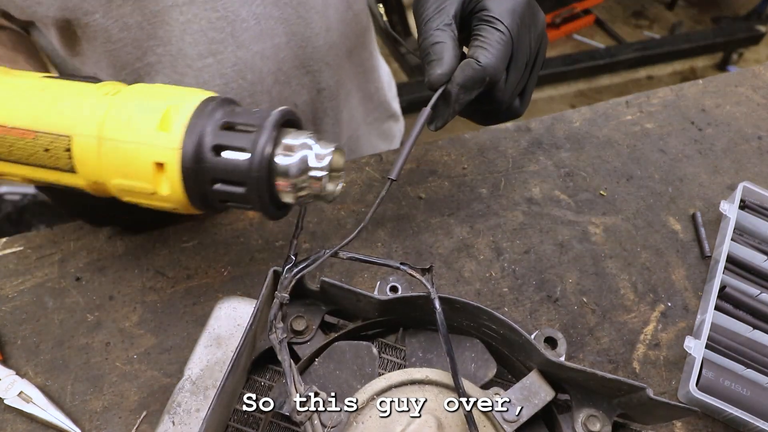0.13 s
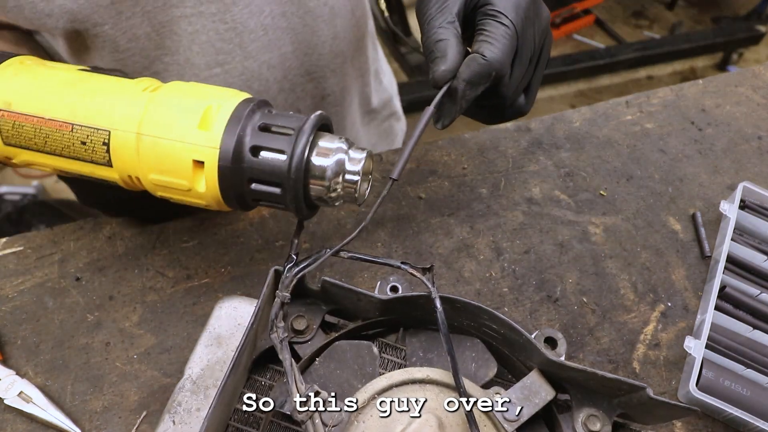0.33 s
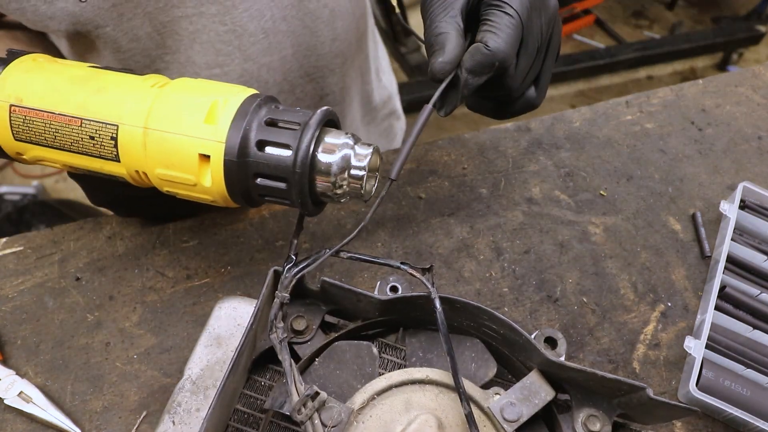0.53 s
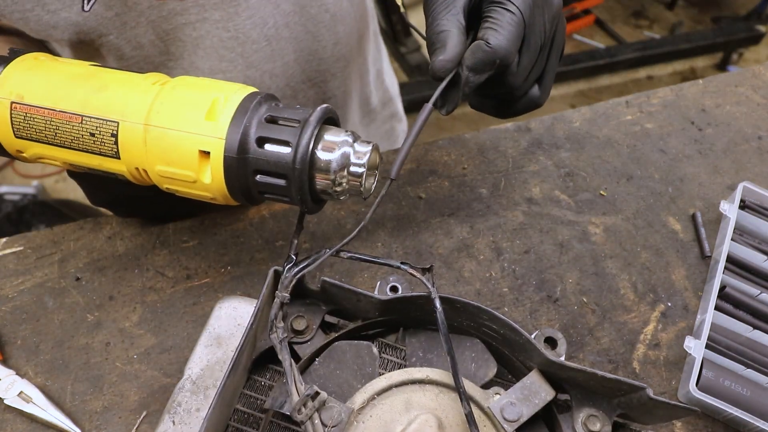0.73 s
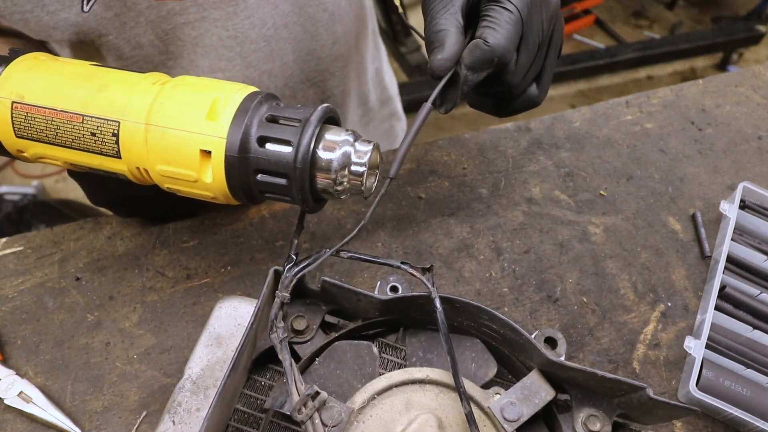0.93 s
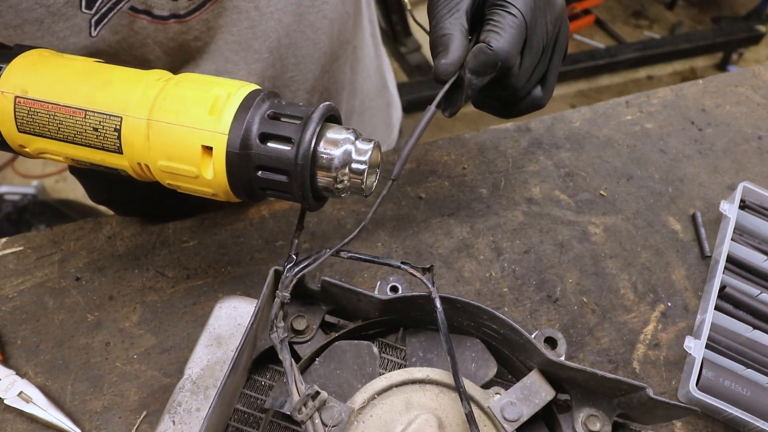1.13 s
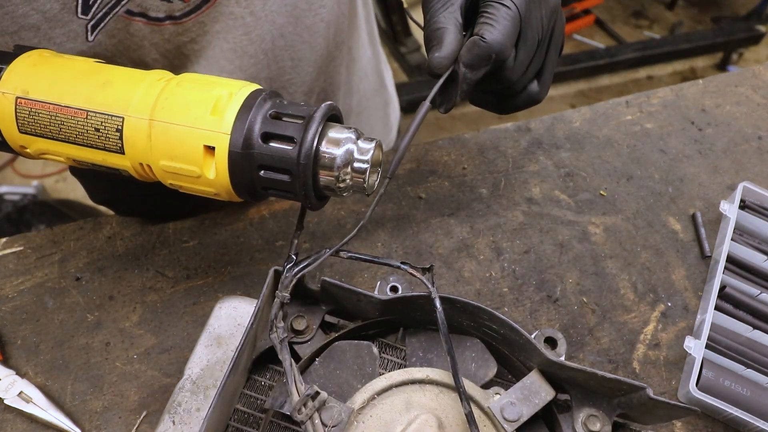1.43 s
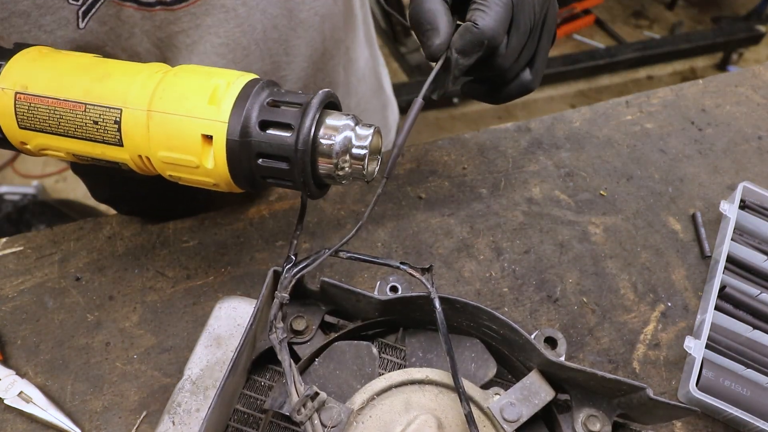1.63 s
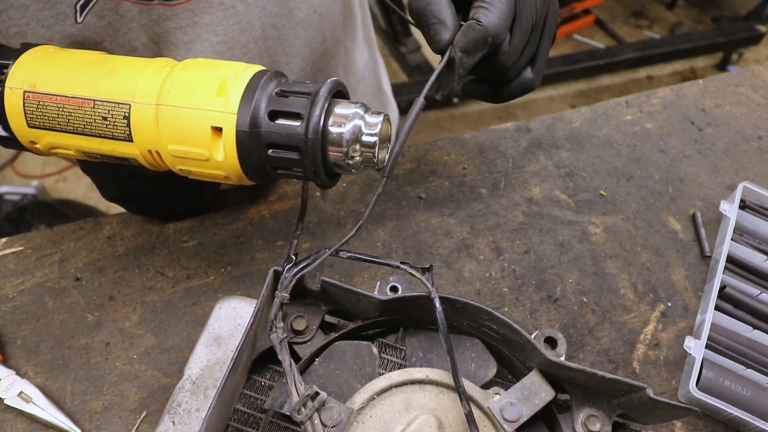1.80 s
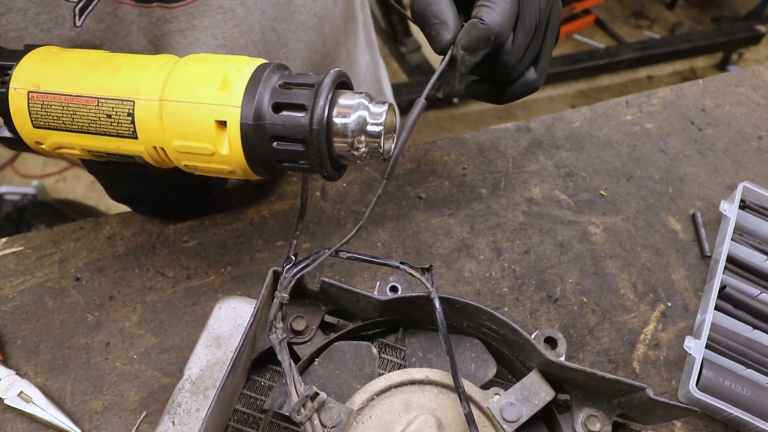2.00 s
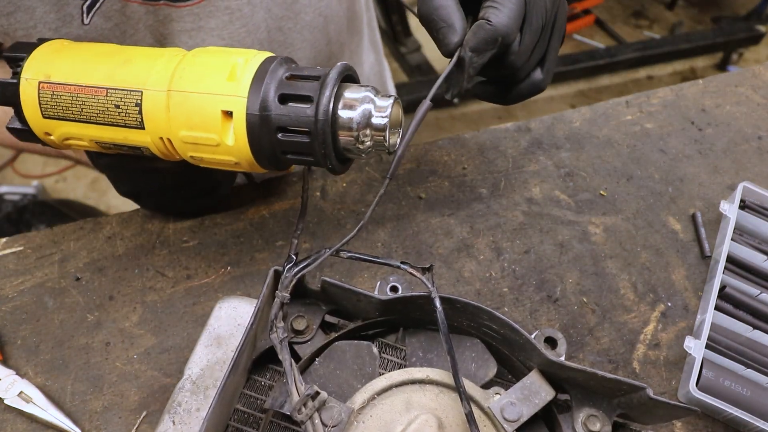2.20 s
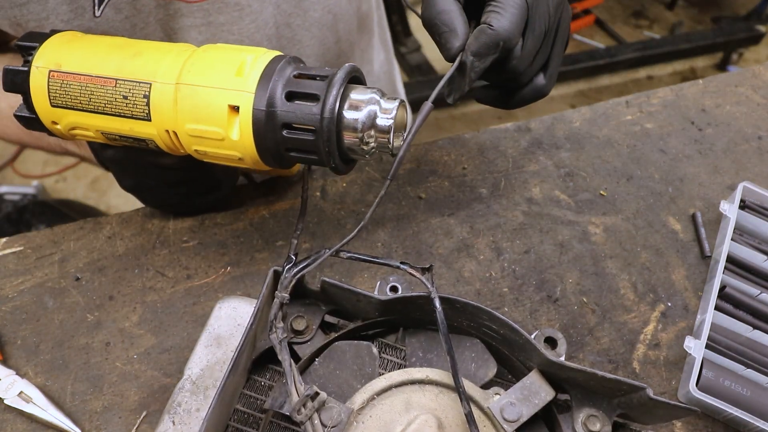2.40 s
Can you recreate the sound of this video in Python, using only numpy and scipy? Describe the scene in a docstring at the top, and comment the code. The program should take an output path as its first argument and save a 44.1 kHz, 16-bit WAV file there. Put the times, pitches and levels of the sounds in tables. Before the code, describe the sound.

Steady loud hiss of hot air from an electric heat gun at a workbench, heard close and dry in the centre; fan whine beneath, an early change of tone, then a faint low bump.

```python
"""An electric heat gun runs steadily over a workbench, close to the microphone, shrinking tubing on a wire.
Throughout, filtered noise makes the rush of the barrel and the hiss of the nozzle's resonances, over
the sine harmonics of the fan's thin whine and a faint mains hum from the motor.
At the start the hiss changes colour as the nozzle swings onto the wire, and a notch slides up the treble.
One soft bump, a short windowed tone, follows; later a band of the treble dips for half a second."""
import sys
import numpy as np
from scipy import signal
from scipy.fft import rfft, irfft
from scipy.io import wavfile

SR = 44100
rng = np.random.default_rng(int(sys.argv[2]) if len(sys.argv) > 2 else 0)


def wav_record(signal):
    """Record a signal, one row per channel, as 16-bit PCM in the file named by sys.argv[1]."""
    frames = np.transpose(np.atleast_2d(signal))
    bounded = np.clip(frames, -1, 1)
    # unit amplitude maps onto the largest positive 16-bit level
    quanta = np.round(bounded * 32767).astype(np.int16)
    wavfile.write(sys.argv[1], SR, quanta)


N = 112454  # samples
TIME = np.arange(N) / SR  # seconds
BINS = np.maximum(np.fft.rfftfreq(N, 1 / SR), 1)  # Hz, kept above zero for divisions and logarithms


def from_db(db):
    """Logarithmic level: decibels become an amplitude gain."""
    return 10 ** (np.asarray(db) / 20)


def in_time(rows):
    """Linear interpolation: each column of a curve is read at every sample."""
    seconds, *columns = np.transpose(rows)
    return [np.interp(TIME, seconds, column) for column in columns]


def drift(rate_hz):
    """Low-pass noise: a smooth random wander with a standard deviation of 1."""
    spectrum = rfft(rng.standard_normal(N))
    slow = irfft(spectrum / (1 + (BINS / rate_hz) ** 2), N)
    return slow / slow.std()


def air_noise(slope=(), resonances=()):
    """Turbulence as shaped white noise: the powers of a broad spectrum and of resonant peaks add."""
    power = 0
    if len(slope):
        hz, density_db = np.transpose(slope)
        # straight lines in dB over log frequency
        power = from_db(np.interp(np.log(BINS), np.log(hz), density_db)) ** 2
    for centre, width, peak_db in resonances:
        detune = (BINS / centre - centre / BINS) * centre / width
        power = power + (from_db(peak_db) / (1 + detune ** 2)) ** 2
    white = rfft(rng.standard_normal(N))
    return irfft(white * np.sqrt(power * SR / 2), N)


def notch(x, centre_hz, depth, width_hz):
    """Heterodyne band rejection: a band is shifted to 0 Hz, low-passed, shifted back and subtracted."""
    carrier = np.exp(2j * np.pi * np.cumsum(centre_hz * np.ones(N)) / SR)
    pole = np.exp(-np.pi * width_hz / SR)
    shifted_band = signal.lfilter([1 - pole], [1, -pole], x / carrier)
    band = 2 * (shifted_band * carrier).real
    return x - np.clip(depth, 0, 1) * band


HUM_HZ, HUM_DB, HUM_WAVER_DB = 604, -62, 2.5  # pitch, typical rms level, standard deviation of the waver


def motor_hum():
    """Amplitude modulation: the motor's faint mains hum is one sine whose level wavers at random."""
    level_db = HUM_DB + HUM_WAVER_DB * drift(6.4)
    return np.sqrt(2) * from_db(level_db) * np.sin(2 * np.pi * HUM_HZ * TIME)


BUMP_S, BUMP_WIDTH_S = .657, 0.0078  # middle, and time from there to 1/e of the envelope's peak
BUMP_HZ, BUMP_DB = 360, -41  # pitch, and peak of the envelope


def bump():
    """Gaussian tone burst: a soft handling bump is a few rounded cycles of one low tone."""
    age = TIME - BUMP_S
    envelope = np.exp(-(age / BUMP_WIDTH_S) ** 2)
    return from_db(BUMP_DB) * envelope * np.sin(2 * np.pi * BUMP_HZ * age)


# Blade-passing rate of the fan. Each row: time in seconds, rate in Hz before a small random wobble.
BLADE_RATE = [(0, 1445), (.17, 1445), (.45, 1438), (.6, 1437.5), (.93, 1429), (1.22, 1426), (1.55, 1430),
              (1.95, 1435.5), (2.38, 1443), (2.55, 1443)]
# Harmonics of the whine. Each row: multiple of the blade rate, rms level in dB before the flicker.
WHINE = [(1, -43.5), (2, -45.5), (3, -48.5), (4, -38.5), (5, -54.5), (6, -45.5), (7, -48.5), (8, -51.5),
         (9, -46), (10, -52), (11, -47)]
SPEED_WOBBLE = 0.00055  # standard deviation, as a fraction of the rate
WHINE_FLICKER_DB, FLICKER_PER_ORDER_DB = 0.8, 0.26  # standard deviation: base, and growth per multiple


def fan_whine():
    """Harmonic series: blades passing make multiples of one rate, and the higher ones flicker more."""
    rate_hz, = in_time(BLADE_RATE)
    wobbling_hz = rate_hz * (1 + SPEED_WOBBLE * drift(25))
    phase = 2 * np.pi * np.cumsum(wobbling_hz) / SR
    whine = np.zeros(N)
    for order, db in WHINE:
        flicker_db = (WHINE_FLICKER_DB + FLICKER_PER_ORDER_DB * order) * drift(14)
        tone = np.sin(round(order) * phase + rng.uniform(0, 2 * np.pi))
        whine += np.sqrt(2) * from_db(db + flicker_db) * tone
    return whine


# Broad rush of air in the barrel.
# Each row: frequency in Hz, power density in dB per Hz before the rush's gain.
RUSH = [(25, -114), (50, -116), (110, -110), (180, -103), (250, -96), (330, -85.5), (430, -83.5),
        (620, -78.5), (900, -75.5), (1400, -74), (2100, -74), (2550, -69), (2900, -74), (4000, -76.5),
        (8000, -77), (16000, -78)]
# Resonances of the barrel.
# Each row: centre in Hz, width in Hz, peak density in dB per Hz before their moving level.
BARREL = [(353.6, 38, -84.5), (3100, 260, -70), (3440, 247, -65.5), (3653, 130, -67.5)]
# Moving level of the barrel's resonances. Each row: time in seconds, gain in dB.
BARREL_LEVEL = [(0, -3), (.25, -5), (.5, -1.5), (1.1, -1), (1.45, 0), (1.8, 0.5), (2.02, 2.5), (2.35, 1),
                (2.55, 1.5)]
RUSH_DB, RUSH_FOLLOWS = -0.67, 0.97  # gain, and dB of rush per dB of flow


def barrel_rush(flow_db):
    """Duct resonance: air drawn through the barrel makes a broad rush, and the barrel rings in it."""
    rush = from_db(RUSH_DB + RUSH_FOLLOWS * flow_db) * air_noise(RUSH)
    ringing_db, = in_time(BARREL_LEVEL)
    ringing = from_db(ringing_db) * air_noise(resonances=BARREL)
    return rush + ringing


# Hiss while the nozzle still points towards the microphone.
# Each row: frequency in Hz, power density in dB per Hz before the front gain.
FRONT_JET = [(150, -135), (1000, -100), (2200, -77), (3050, -64.5), (3550, -63), (3950, -70.5), (4800, -60),
             (5550, -58), (6350, -66), (7100, -60.5), (8700, -60), (9600, -65), (10100, -53), (10600, -74),
             (11500, -68), (13200, -65), (14000, -70), (15500, -67)]
FRONT_DB = -0.9
# Smooth hiss of the jet from the side.
# Each row: frequency in Hz, power density in dB per Hz before the hiss's gains.
JET = [(150, -135), (1000, -100), (4000, -77), (4800, -64), (7600, -66.5), (8400, -71), (9100, -73.5),
       (12000, -75), (14000, -72.5), (16000, -75)]
# Resonances of the nozzle.
# Each row: centre in Hz, width in Hz, peak density in dB per Hz before the hiss's gains.
NOZZLE = [(4330, 160, -68), (4780, 350, -63.5), (5030, 370, -68), (5418, 450, -55), (5990, 440, -57),
          (6500, 590, -59.5), (7160, 97, -71), (8560, 130, -69), (9650, 670, -64.5), (10070, 220, -61),
          (10520, 730, -56.5), (11150, 540, -62.5), (11580, 240, -64.5), (11700, 250, -71),
          (12340, 350, -64.5), (13300, 570, -65.5), (14150, 280, -73), (14830, 300, -68), (15560, 620, -64)]
HISS_DB, HISS_FOLLOWS = -0.51, 1  # gain, and dB of hiss per dB of flow
# Treble of the side hiss against the rest of it. Each row: time in seconds, gain in dB.
TREBLE_LEVEL = [(.15, 3), (.3, 2.5), (.55, 1.1), (.8, 0.4), (1.05, 0), (1.42, 0), (1.65, 1), (1.85, 0.4),
                (2.2, -1), (2.5, 0.5)]
TREBLE_FROM_HZ = 12000
SWING_S, SWING_TIME_S = 0.12, 0.047  # middle of the swing, and how gradually it happens
# Notch that slides up through the treble during the swing.
# Each row: time in seconds, centre in Hz, depth from 0 to 1.
SWING_NOTCH = [(0, 10400, .65), (.09, 11200, 0.8), (.15, 12300, 0.7), (.21, 13500, 0.3), (.37, 14100, 0.4),
               (.5, 13900, .25)]
# Dip of one treble band for a while.
# One row: start in seconds, end in seconds, centre in Hz, width in Hz, depth from 0 to 1.
TREBLE_DIP = (1.2, 1.7, 9520, 640, 0.81)
DIP_FADE_S = 0.1
TURBULENCE_DB, TURBULENCE_PER_S = 0.45, 50  # standard deviation and rate of the flutter


def nozzle_hiss(flow_db):
    """Jet directivity: the fluttering jet is heard first from the front, then from the side."""
    front = from_db(FRONT_DB) * air_noise(FRONT_JET)
    side = from_db(HISS_DB + HISS_FOLLOWS * flow_db) * air_noise(JET, NOZZLE)
    treble = irfft(rfft(side) / (1 + (TREBLE_FROM_HZ / BINS) ** 10), N)
    treble_db, = in_time(TREBLE_LEVEL)
    side = side + (from_db(treble_db) - 1) * treble

    # equal-power crossfade from front to side
    turned = .5 + .5 * np.tanh((TIME - SWING_S) / (2 * SWING_TIME_S))
    hiss = np.sqrt(1 - turned) * front + np.sqrt(turned) * side

    notch_hz, notch_depth = in_time(SWING_NOTCH)
    hiss = notch(hiss, notch_hz, notch_depth, width_hz=950)
    start, end, dip_hz, dip_width_hz, dip_depth = TREBLE_DIP
    held = np.clip(np.minimum(TIME - start, end - TIME) / DIP_FADE_S + .5, 0, 1)
    hiss = notch(hiss, dip_hz, dip_depth * held, dip_width_hz)
    return hiss * from_db(TURBULENCE_DB * drift(TURBULENCE_PER_S))


# Strength of the airflow; only the departures from each column's mean over time are used.
# Each row: time in seconds, level of the rush in dB, level of the hiss in dB.
FLOW = [(0.2, -50.5, -26), (0.21, -50, -27.5), (0.47, -49, -25.5), (1.02, -48, -25), (1.1, -49.5, -25),
        (1.16, -46.5, -26), (1.19, -48, -25), (1.33, -47, -25), (1.98, -46, -25.5), (2.49, -47.5, -26.5),
        (2.5, -46.5, -26.5)]


def scene():
    """Superposition: the sources add, and identical channels place the gun in the centre."""
    rush_db, hiss_db = (db - db.mean() for db in in_time(FLOW))
    gun = motor_hum() + bump() + fan_whine() + barrel_rush(rush_db) + nozzle_hiss(hiss_db)
    return np.array([gun, gun])


CUTOFF_HZ = 15800


def record(dry):
    """Low-pass filtering: a very steep magnitude response cuts the top."""
    return irfft(rfft(dry) / np.sqrt(1 + (BINS / CUTOFF_HZ) ** 600), N)


dry = scene()
out = record(dry)
wav_record(out)
```